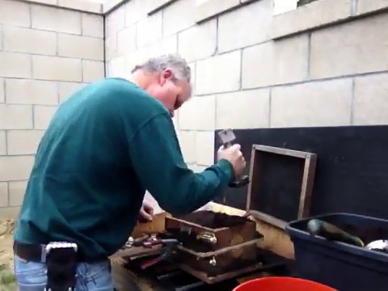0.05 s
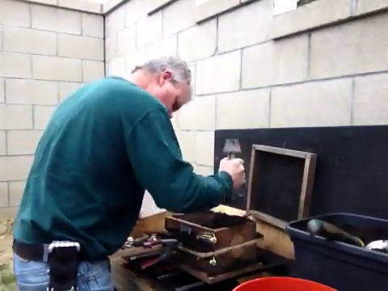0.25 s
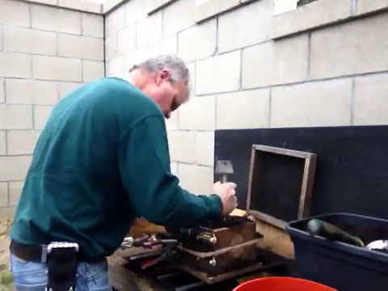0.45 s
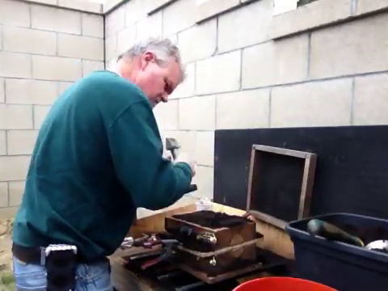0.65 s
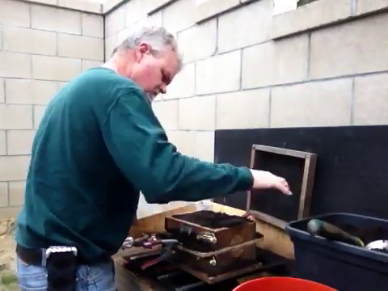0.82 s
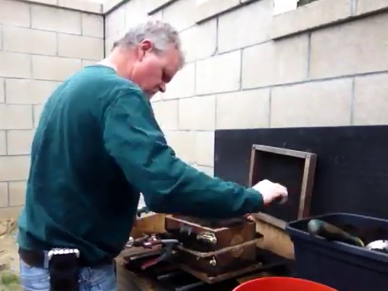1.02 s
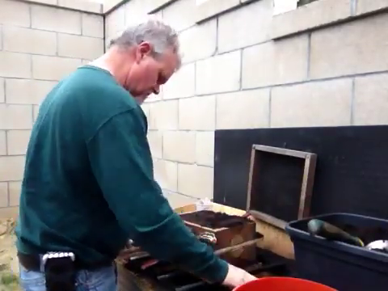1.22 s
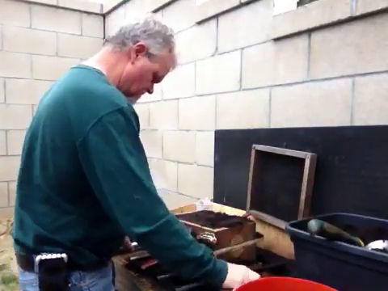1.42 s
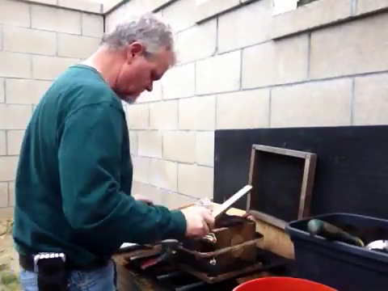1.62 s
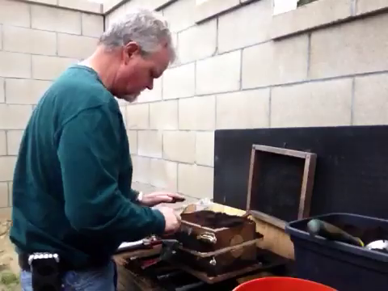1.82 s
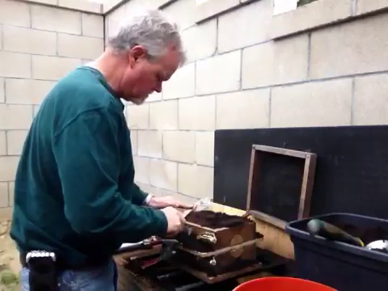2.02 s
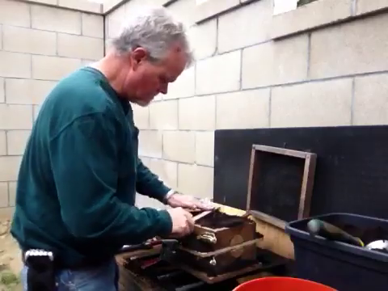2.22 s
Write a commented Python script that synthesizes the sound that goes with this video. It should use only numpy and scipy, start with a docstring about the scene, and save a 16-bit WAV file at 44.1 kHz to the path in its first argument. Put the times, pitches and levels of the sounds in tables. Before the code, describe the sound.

Hard knocks on a wooden box, followed by a steel bar clinking and scraping across sand.

```python
"""Outdoors by a block wall, over a quiet hum, a hand tool knocks on a wooden sand mold box: each blow
cracks, booms and rattles. Steel clinks, loose sand trickles down and a bird whistles far off.
A flat bar is drawn off the bench with a few bumps and a steel ring, and the bird calls once more.
The bar taps the box and scrapes the sand level, its edge singing hoarsely. Walls add a short echo."""
import sys
import numpy as np
from scipy import signal
from scipy.fft import rfft, irfft, next_fast_len
from scipy.io import wavfile
from scipy.ndimage import map_coordinates

SR = 44100
rng = np.random.default_rng(int(sys.argv[2]) if len(sys.argv) > 2 else 0)


def wav_out(sig):
    """Save sig, one row per channel (or a flat mono array), as 16-bit PCM at SR to the path in sys.argv[1]."""
    wavfile.write(sys.argv[1], SR, np.round(np.clip(np.atleast_2d(sig).T, -1, 1) * 32767).astype(np.int16))


N = 103635
T = np.arange(SR) / SR  # one second, the clock of each short sound

# blows on the box, the first already dying away
# (time [s], level [dB], relative crack level [dB], crack t60 [s], thump delay [s], rattle delay [s])
BLOWS = [(-.08, -5, -17, .04, 0.0039, 0.004), (0.2015, -1, 2.5, 0.037, 0.0062, .012),
         (0.4898, 0, -9, 0.069, 0.0053, .012)]
# wooden body of the box (frequency [Hz], gain [dB], t60 [s])
BOX_MODES = [(140.9, -13.5, 0.22), (170.3, -0.5, 0.12), (215.1, -10.5, 0.2), (277.3, -15.5, 0.18),
             (402.2, -18, 0.25), (507, -18, 0.15), (628, -18, 0.11), (813.6, -14, 0.06), (884, -22, 0.15),
             (1021, -15, 0.1), (1167, -16.5, 0.057), (1352, -17, 0.083), (1988, -14.5, 0.058),
             (2447, -19, 0.074)]
# colours of a blow's hard attack, low thump and rattle (frequency [Hz], gain [dB])
CRACK_EQ = [(60, -57), (150, 3), (500, -8.5), (1200, 11), (1650, -5), (2000, 4), (3300, -4.5),
            (5000, -12.5), (10000, -22), (15000, -30)]
THUMP_EQ = [(30, -28), (70, -41), (115, -9), (180, -7.5), (400, -3), (900, -11.5), (1300, -14.5),
            (1650, -15.5), (2500, -18.5), (6000, -42.5)]
RATTLE_EQ = [(200, 11), (1000, -5.5), (2500, -4), (4600, 2.5), (7300, 0), (10400, -2.5), (11300, -10),
             (15000, -17)]
# ring of the loose metal fittings (frequency [Hz], gain [dB], t60 [s])
FITTING_MODES = [(4620, -7.5, 0.17), (5250, -12, .14), (5610, -6.5, 0.12), (5840, -2.5, 0.059),
                 (7210, -6, 0.12), (10250, -1.5, 0.11)]
# the box rocking back onto the bench (time [s], level [dB])
REBOUNDS = [(0.2476, -17), (.264, -24), (0.294, -32), (0.538, -16), (.559, -26), (.585, -35.5)]
# colour of the outdoor hum (frequency [Hz], gain [dB])
AIR_EQ = [(25, -40), (70, -10), (120, 5), (280, -4.5), (1000, -9), (1850, -17.5), (3700, -20),
          (5100, -26.5), (15000, -30.5)]
# decay of the echo off the walls (frequency [Hz], t60 [s])
YARD_DECAY = [(200, 0.17), (1000, 0.32), (4000, 0.34), (10000, 0.18)]
# steel touches (time [s], ring [dB], brush noise [dB], share of the free t60 [ratio], jingle [dB])
CLINKS = [(0.226, -39, -42, .5, -47), (1.467, -57, -47.5, 0.47, -60), (1.5225, -32.5, -35.5, 0.94, -45),
          (1.563, -38, -52, 0.43, -42)]
# bright ring of the bar (frequency [Hz], gain [dB], free t60 [s])
STEEL_MODES = [(4630, -18.5, 0.61), (4904, -25.5, 0.78), (5640, -0.5, 0.6), (7160, -13, 0.25),
               (9545, -2, 0.12), (12300, -16.5, .14)]
# a small steel tool lying next to the bar (frequency [Hz], gain [dB], t60 [s])
JINGLE_MODES = [(8010, -4, .09), (10030, -1.5, 0.11), (11680, -4.5, 0.095), (13540, -8, .06),
                (14530, -10, .11)]
# colour of steel brushing steel (frequency [Hz], gain [dB])
BRUSH_EQ = [(500, -9.5), (3600, 9.5), (6000, -2), (10000, 1), (15000, -22.5)]
# spills of loose sand (time [s], level [dB])
TRICKLES = [(0.404, -64), (0.718, -59), (0.789, -57.5)]
# colour of moving sand (frequency [Hz], gain [dB])
SAND_EQ = [(59, -40), (110, -1), (200, -10), (500, -16), (780, -4), (3050, -6.5), (3700, -5.5),
           (6100, -6.5), (12000, -13), (15000, -22.5)]
# distant bird notes (time [s], length [s], start pitch [Hz], end pitch [Hz], level [dB])
BIRD_NOTES = [(0.674, 0.05, 3790, 4020, -60), (0.9, 0.071, 4250, 3050, -59),
              (0.985, 0.092, 3100, 3390, -61), (1.762, 0.073, 3650, 4040, -62.5)]
# swell of the bar sliding on the bench (time [s], level [dB])
DRAG_LEVEL = [(1.28, -100), (1.34, -49), (1.43, -44), (1.52, -36), (1.6, -35), (1.69, -53.5), (1.82, -57.5),
              (1.95, -61)]
# colour of that slide (frequency [Hz], gain [dB])
DRAG_EQ = [(100, -21), (200, 2.5), (420, 3), (900, -3), (1800, -21), (6000, -27.5), (15000, -36)]
# bumps on the bench (time [s], level [dB], brightness [dB/octave], boom [dB])
BUMPS = [(1.333, -44, -2, -32.5), (1.365, -65, -11, -33.5), (1.403, -31, -2, -29),
         (1.4475, -27, -9.5, -27.5), (1.495, -29.5, 4, -55), (1.526, -22, 4.5, -59), (1.5437, -7, -1, -37),
         (1.5697, -15, -5.5, -58), (1.586, -21.5, -11, -37), (1.635, -33, -5, -33)]
# colour of a bump's thud (frequency [Hz], gain [dB])
BENCH_EQ = [(60, -47), (240, -27), (330, -19), (450, 5.5), (680, -16.5), (880, -9), (1450, -8),
            (2500, -23.5), (4500, -31.5), (7000, -38), (15000, -51)]
# knock and low boom of the bench top (frequency [Hz], gain [dB], t60 [s])
BENCH_MODES = [(421.7, -7.5, 0.19), (498.4, -5.5, 0.23), (626.5, -15, 0.19), (822.7, -11, 0.25),
               (872.3, -3.5, 0.14), (1432, -21, 0.08), (2090, -24.5, 0.18)]
BOOM_MODES = [(161.7, -9.5, 0.2), (211, -4, 0.24), (344, 1.5, 0.038)]
# dry ring of the bar on the rim of the box (frequency [Hz], gain [dB], t60 [s])
TAP_MODES = [(1198, 0, 0.044), (1847, -0.5, 0.012), (2262, -12.5, 0.091), (3475, -15, 0.026)]
# colour of that tap's tick (frequency [Hz], gain [dB])
TICK_EQ = [(150, -18), (700, -9), (1150, 1.5), (2000, -11.5), (4000, -23.5), (15000, -31.5)]
# effort of the scraping stroke (time [s], level [dB])
STROKE_LEVEL = [(1.9, -110), (1.92, -56.5), (1.96, -53), (2.01, -58.5), (2.09, -45), (2.17, -42.5),
                (2.26, -39.5), (2.29, -39.5), (2.35, -40.5)]
# squeak of the bar's edge (time [s], level [dB], pitch [Hz])
SQUEAK = [(2.0, -100, 3460), (2.09, -53.5, 3580), (2.163, -52, 3475), (2.175, -43.5, 3470),
          (2.225, -45.5, 3480), (2.272, -43.5, 3600), (2.287, -63, 3600), (2.35, -48, 3460)]


def amp(db):
    """Decibels to gain."""
    return 10 ** (np.asarray(db) / 20)


def unit(x):
    """Scale to rms 1."""
    return x / np.sqrt(np.mean(x ** 2) + 1e-20)


def along(points, hz):
    """Read (frequency, value) points on a log frequency axis."""
    knots_hz, values = np.transpose(points)
    return np.interp(np.log(hz + 1), np.log(knots_hz + 1), values)


def curves(rows):
    """Automation: one value per sample for each column after the time."""
    times, *columns = np.transpose(rows)
    return [np.interp(np.arange(N) / SR, times, column) for column in columns]


def wobble(rate, size):
    """A smooth random curve, rate knots a second."""
    return map_coordinates(rng.standard_normal(N // 4), [np.arange(size) * rate / SR], mode="wrap")


def noise(eq, size, grain_db=0, tilt_db=0):
    """Coloured noise of rms 1, clumped into grains and tilted per octave."""
    hz = np.fft.rfftfreq(size, 1 / SR)
    grains = rng.standard_normal(size) * amp(grain_db * wobble(900, size))
    colour_db = along(eq, hz) + tilt_db * np.log2(np.clip(hz, 150, 2000))
    return unit(irfft(rfft(grains) * amp(colour_db), size))


def envelope(attack, t60, hold=0):
    """Rise, hold and exponential release, all in seconds."""
    return (1 - np.exp(-T / attack)) * amp(-60 * np.maximum(T - hold, 0) / t60)


def ring(modes, attack, rough=0.28):
    """Damped modes whose phases waver, a little different at every hit."""
    out = np.zeros(SR)
    for hz, db, t60 in modes:
        phase = 2 * np.pi * hz * T + rough * wobble(86, SR) + rng.uniform(0, 2 * np.pi)
        out += amp(db) * envelope(attack, t60) * np.sin(phase)
    return out


def add(track, s, sound):
    """Mix a sound in at time s."""
    start = round(s * SR)
    part = sound[max(-start, 0):N - start]
    track[max(start, 0):][:len(part)] += part


def box_boom(rise_cycles=0.76):
    """The struck boards ring; the low modes swell more slowly than the high ones."""
    out = np.zeros(SR)
    for hz, db, t60 in BOX_MODES:
        phase = 2 * np.pi * hz * T + 0.38 * wobble(80, SR)
        out += amp(db) * envelope(rise_cycles / hz, t60) * np.sin(phase)
    return out


def box_blows():
    """The tool lands with a hard crack, then the heavy box booms and rattles its loose fittings."""
    out = np.zeros(N)
    for s, db, crack_db, crack_t60, thump_delay, rattle_delay in BLOWS:
        boom = box_boom()
        crack = amp(crack_db) * noise(CRACK_EQ, SR) * envelope(0.0023, crack_t60)
        thump = amp(-16.5) * noise(THUMP_EQ, SR) * envelope(0.002, t60=0.27)
        rattle = amp(-24) * noise(RATTLE_EQ, SR, grain_db=4.5) * envelope(0.00092, t60=0.1, hold=0.036)
        fittings = amp(-21.5) * ring(FITTING_MODES, attack=0.00321)
        add(out, s, amp(db) * crack)
        add(out, s + thump_delay / 2, amp(db) * boom)
        add(out, s + thump_delay, amp(db) * thump)
        add(out, s + rattle_delay, amp(db) * (rattle + fittings))
    return out


def outdoor_hum():
    """A quiet bed of low noise whose level flutters slightly."""
    return amp(-53.5 + 0.97 * wobble(7.59, N)) * noise(AIR_EQ, N)


def yard_echo(x):
    """Walls scatter the sound into a short tail; the bass and the top treble die first."""
    hz, t, spectrum = signal.stft(rng.standard_normal(SR), SR, nperseg=256)
    decay = amp(-60 * t / along(YARD_DECAY, hz)[:, None])
    tail = signal.istft(spectrum * decay, SR, nperseg=256)[1]
    tail *= 1 - np.exp(-np.arange(len(tail)) / SR / 0.0026)  # soft onset
    return signal.fftconvolve(x, tail / np.linalg.norm(tail))[:N]


def steel_clinks():
    """The bar brushes a small tool, which jingles; the bar rings on, for less time when it is held."""
    out = np.zeros(N)
    for s, ring_db, brush_db, t60_share, jingle_db in CLINKS:
        modes = [(hz, db, t60 * t60_share) for hz, db, t60 in STEEL_MODES]
        add(out, s, amp(ring_db) * ring(modes, attack=0.0056, rough=0.05))
        add(out, s, amp(jingle_db) * ring(JINGLE_MODES, attack=0.0014))
        add(out, s, amp(brush_db) * noise(BRUSH_EQ, SR, grain_db=5) * envelope(0.001, t60=0.14))
    return out


def box_rebounds():
    """The jolted box rocks back onto the bench in dull, fading thuds."""
    out = np.zeros(N)
    for s, db in REBOUNDS:
        add(out, s, amp(db) * noise(THUMP_EQ, SR, tilt_db=-3.5) * envelope(0.0013, t60=0.1))
    return out


def sand_trickles():
    """Sand shaken loose patters down after a blow."""
    out = np.zeros(N)
    for s, db in TRICKLES:
        add(out, s, amp(db) * noise(SAND_EQ, SR, grain_db=1.5) * envelope(0.012, t60=0.098, hold=0.02))
    return out


def bird(blur_hz=190):
    """Faint gliding whistles, blurred by distance and wet with echo."""
    out = np.zeros(N)
    for s, length, start_hz, end_hz, db in BIRD_NOTES:
        progress = np.minimum(T / length, 1)
        hz = start_hz + (end_hz - start_hz) * progress + blur_hz * wobble(707, SR)
        whistle = np.sin(2 * np.pi * np.cumsum(hz) / SR)
        add(out, s, amp(db) * np.sin(np.pi * progress) * whistle)
    return out + amp(-0.5) * yard_echo(out)


def bench_drag(damp_s=0.015, share_left=0.39):
    """The bar slides and bumps along the bench; its weight soon damps each knock, and the top booms."""
    drag_db, = curves(DRAG_LEVEL)
    out = amp(drag_db) * noise(DRAG_EQ, N, grain_db=2.0)
    damping = share_left + (1 - share_left) * np.exp(-(T / damp_s) ** 2)
    for s, db, bright_db, boom_db in BUMPS:
        modes = [(hz, gain + bright_db * np.log2(hz / 450), t60) for hz, gain, t60 in BENCH_MODES]
        thud = amp(-6.5) * noise(BENCH_EQ, SR, tilt_db=bright_db) * envelope(0.0023, t60=0.16)
        knock = ring(modes, attack=0.0015, rough=0.2)
        add(out, s, amp(db) * damping * (thud + knock))
        add(out, s, amp(boom_db) * ring(BOOM_MODES, attack=0.0017))
    return out


def bar_tap(at_s=1.916):
    """The flat bar meets the rim with a dry tick, and the box answers softly."""
    out = np.zeros(N)
    bar = ring(TAP_MODES, attack=0.00041)
    tick = amp(-5.5) * noise(TICK_EQ, SR) * envelope(0.00042, t60=0.035)
    add(out, at_s, amp(-24.5) * (bar + tick))
    add(out, at_s, amp(-35) * ring(BOX_MODES, attack=0.025))
    return out


def sand_scrape(width_hz=260):
    """Sand grains hiss under the bar, whose edge sings in a hoarse, narrow band."""
    effort_db, = curves(STROKE_LEVEL)
    squeak_db, squeak_hz = curves(SQUEAK)
    phase = 2 * np.pi * np.cumsum(squeak_hz) / SR
    edge = unit(wobble(width_hz, N) * np.sin(phase) + wobble(width_hz, N) * np.cos(phase))
    hiss = noise(SAND_EQ, N, grain_db=1.5)
    return amp(effort_db) * hiss + amp(squeak_db) * edge


def scene():
    """Mono mix: the work at the bench up front, its echo, the bird and the hum behind."""
    work = box_blows() + box_rebounds() + bench_drag() + steel_clinks()
    work += bar_tap() + sand_scrape() + sand_trickles()
    return (work + outdoor_hum() + amp(-20.5) * yard_echo(work) + bird())[None]


def record(dry):
    """Cut the deep bass, round off the highest peaks and remove the very top of the treble."""
    low_cut_hz, top_hz = 129, 15450
    thin = signal.sosfilt(signal.butter(2, low_cut_hz, "high", fs=SR, output="sos"), dry)
    rounded = thin / (1 + thin ** 8) ** (1 / 8)
    size = next_fast_len(N + SR // 2)
    passband = np.fft.rfftfreq(size, 1 / SR) < top_hz
    return irfft(rfft(rounded, size) * passband, size)[:, :N]


dry = scene()
out = record(dry)
wav_out(out)
```